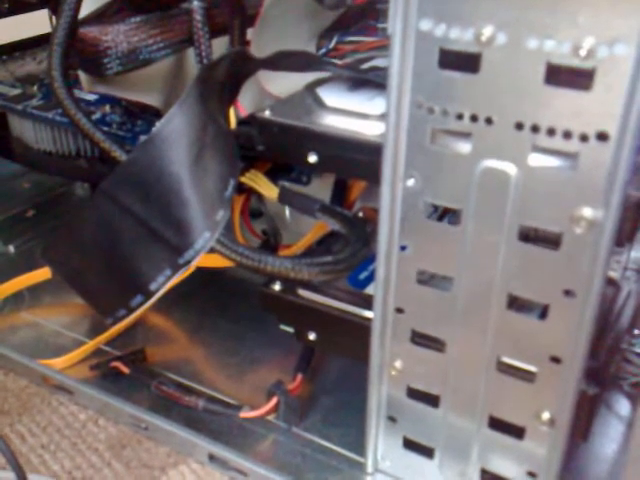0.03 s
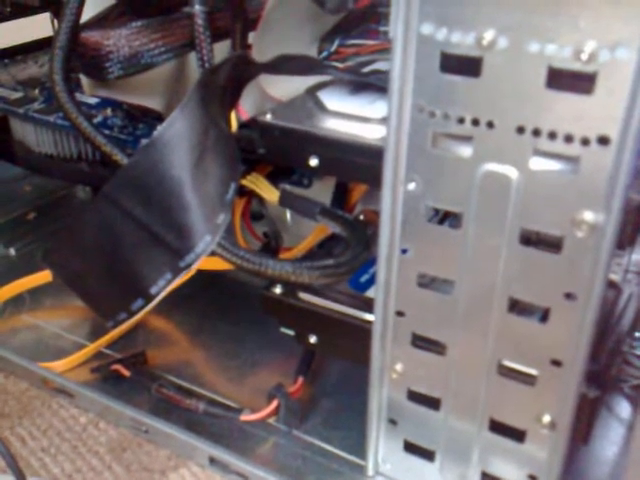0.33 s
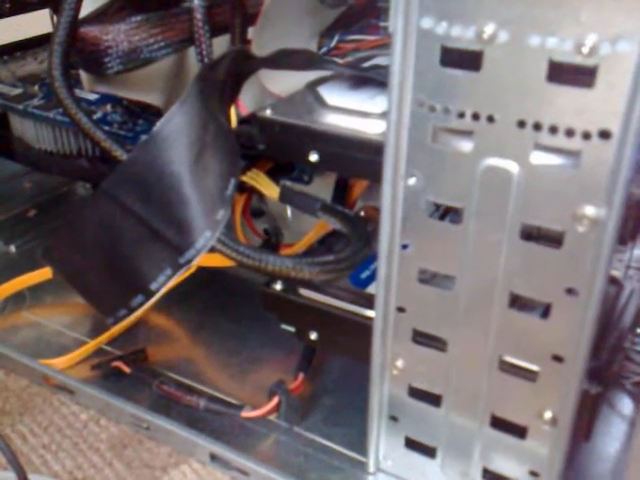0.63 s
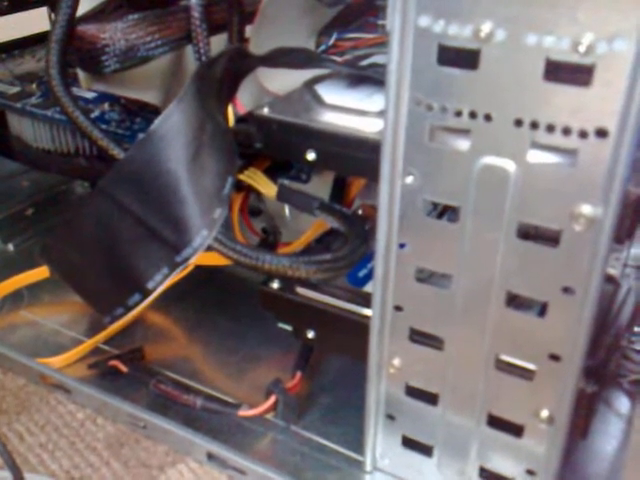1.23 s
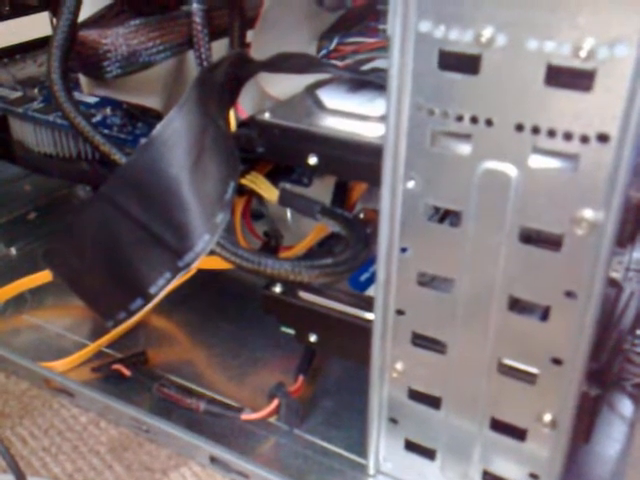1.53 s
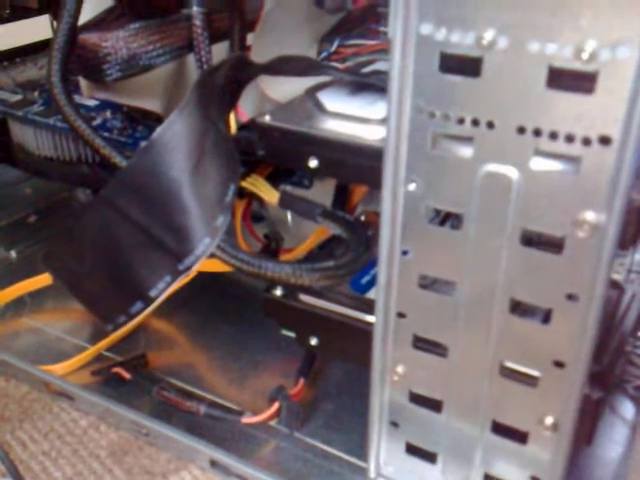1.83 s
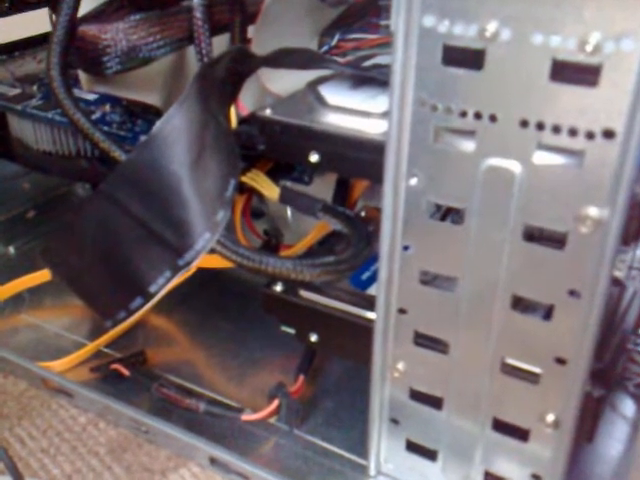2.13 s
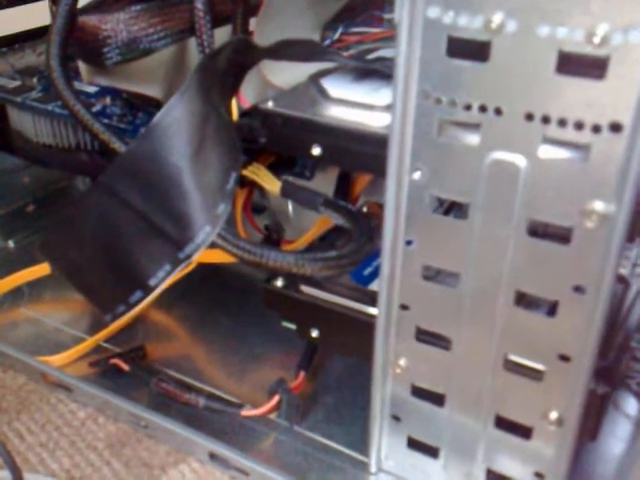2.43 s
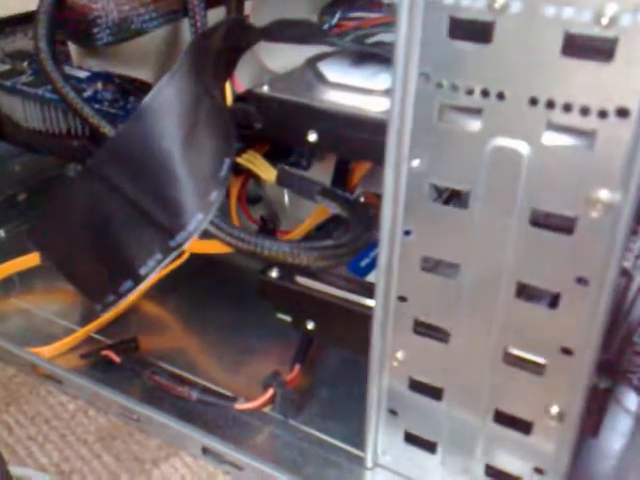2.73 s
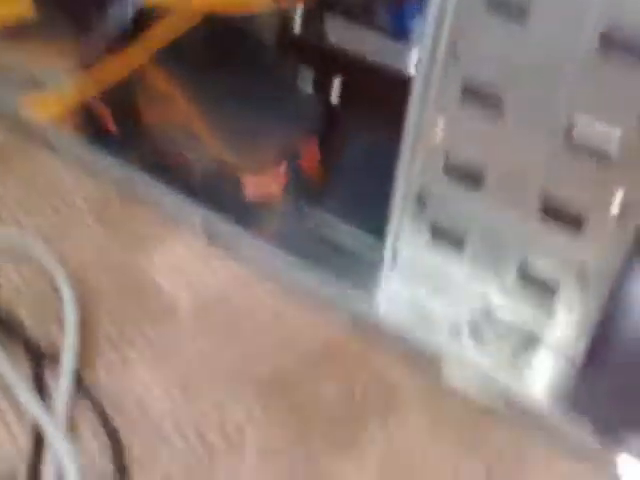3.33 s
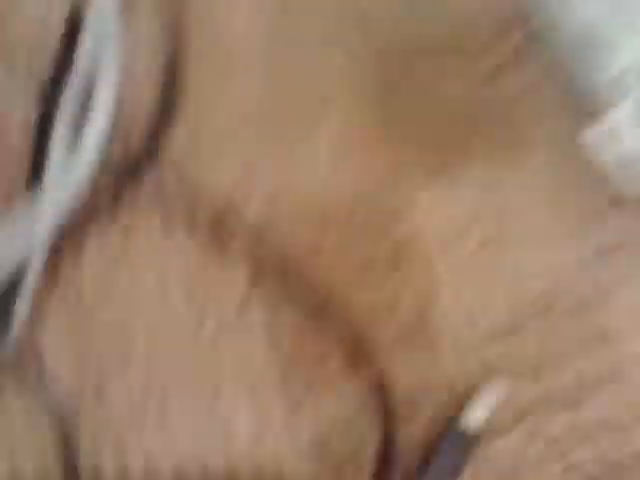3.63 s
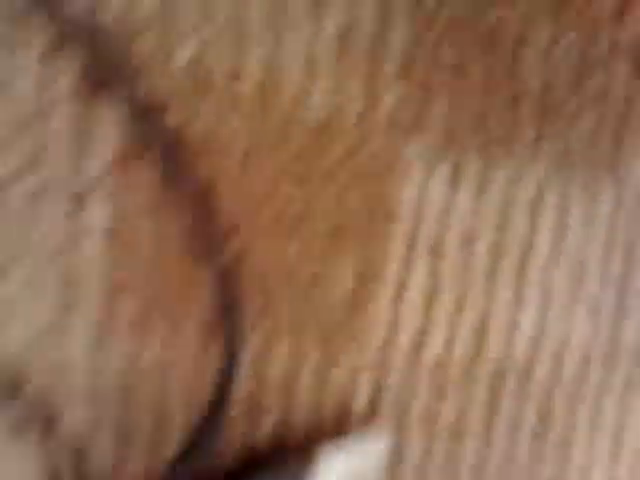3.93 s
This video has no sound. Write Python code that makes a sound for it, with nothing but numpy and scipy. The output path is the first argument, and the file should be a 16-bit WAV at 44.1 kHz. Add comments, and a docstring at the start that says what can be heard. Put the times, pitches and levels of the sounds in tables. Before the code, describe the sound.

A spinning hard drive makes an open metal computer case buzz, swelling and fading over a steady fan rush and low hum. Near the end, fingers click and knock lightly on the close hand-held microphone in the room.

```python
"""Fans rush steadily with a low hum and wavering tones, and a faint ring dies away at once.
Over them swells and fades a buzz: a spinning hard drive makes the sheet metal of an open computer
case slap once a turn, giving harmonics and a rasp. Near the end a hand-held camera swings down past
the case: fingers click and knock on its shell, the draught grows and a thin motor whine stands out."""
import sys
import numpy as np
from scipy import signal
from scipy.fft import rfft, irfft
from scipy.io import wavfile

SR = 44100
rng = np.random.default_rng(int(sys.argv[2]) if len(sys.argv) > 2 else 0)


def persist_wave(psi):
    """Save psi, clipped to +-1, as 16-bit WAV."""
    counts = np.round(np.clip(psi, -1, 1) * 32767).astype(np.int16)
    wavfile.write(sys.argv[1], SR, np.atleast_2d(counts).T)


N = 176400
TIME = np.arange(N) / SR


def amp(db):
    """Decibels to amplitude ratio."""
    return 10 ** (np.asarray(db) / 20)

def envelope(rows):
    """Gain interpolated in decibels between rows of (seconds, dB)."""
    return amp(np.interp(TIME, *np.array(rows).T))

def wander(rate_hz):
    """Slow random fluctuation with a standard deviation near 1."""
    steps = rng.standard_normal(1024)
    return 1.224 * np.interp(TIME * rate_hz, np.arange(len(steps)), steps)

def decay(t, t60):
    """Exponential damping: 60 dB in t60 seconds."""
    return np.exp(-np.log(1000) * t / t60)

def colour(x, points):
    """Zero-phase filtering by a curve of (Hz, dB)."""
    hz, db = np.array(points).T
    bins_hz = np.maximum(np.fft.rfftfreq(len(x), 1 / SR), 1)
    return irfft(rfft(x) * amp(np.interp(np.log(bins_hz), np.log(hz), db)), len(x))

def noise(density):
    """Gaussian noise with a spectral density of (Hz, dB per Hz)."""
    return colour(rng.standard_normal(N), density) * np.sqrt(SR / 2)


# The fans' rush. Each row: frequency in Hz, density in dB per Hz.
RUSH_SPECTRUM = [(20, -93), (55, -92), (90, -94), (120, -77), (150, -91), (250, -89), (290, -91.5),
                 (420, -93.5), (490, -85.5), (560, -96), (680, -98), (800, -98), (1020, -98), (1170, -89.5),
                 (1320, -99.5), (1550, -101), (1900, -100), (2600, -105), (3400, -107), (5500, -108.5),
                 (7000, -110), (9600, -110), (10100, -103), (10600, -110), (16000, -109)]
# The draught at a closeness of 0 dB. Each row: frequency in Hz, density in dB per Hz.
DRAUGHT_SPECTRUM = [(30, -102), (105, -83), (200, -82), (330, -87), (560, -94.5), (680, -90), (780, -87.5),
                    (1000, -99.5), (1160, -84), (1320, -96), (2700, -102), (3100, -99), (3400, -103),
                    (3800, -99), (4500, -105), (6000, -105), (8000, -114), (16000, -116)]
# Closeness to the fan as the camera swings. Each row: time in seconds, gain in dB.
CLOSENESS = [(0, -20), (2.6, -9), (3.1, -5), (3.5, -7), (3.75, -1.5), (3.87, 0.5), (4, 0.5)]
# Mains hum near 100 Hz, and fan and motor tones. Each row: frequency in Hz, distant level in dB, # change close
# by in dB, pitch wander in Hz.
TONES = [(99, -72.5, 13.5, 3.9), (119.8, -78, 20.5, 6.15), (249.5, -74.5, 6.5, 5.75),
         (361.7, -70, 5, 4.5), (970, -78.5, -6, 2.6), (975, -82, 3, 2.4), (1173, -80, 2, 19),
         (1442, -75, -4, 3.1), (3100, -100, 24, 20.3), (10110, -90, 3, 64)]

def fans():
    """Moving air gives broadband noise, rotation and the mains give tones; the draught grows with proximity."""
    close = envelope(CLOSENESS)
    tone_reach = close ** 2.3  # the tones carry less far than the draught
    out = noise(RUSH_SPECTRUM) * amp(0.5 * wander(22))
    out += close * noise(DRAUGHT_SPECTRUM) * amp(0.27 * wander(21.05))
    for hz, db, close_db, wander_hz in TONES:
        phase = 2 * np.pi * np.cumsum(hz + wander_hz * wander(50)) / SR
        level_db = db + close_db * tone_reach + 1.77 * wander(21.78)
        out += np.sqrt(2) * amp(level_db) * np.sin(phase)
    return out


# The motor's whine. Each row: time in seconds, level in dB.
WHINE_LEVEL = [(3.8, -84), (3.87, -80), (3.93, -71)]

def motor_whine(hz=12990):
    """Directivity: a high tone is beamed so narrowly that it stands out only after the swing."""
    level = envelope(WHINE_LEVEL) * amp(2 * wander(27))
    return np.sqrt(2) * level * np.sin(2 * np.pi * hz * TIME)


def faint_ring(hz=813, db=-55.5):
    """Free decay: one soft damped sinusoid at the very start."""
    return amp(db) * decay(TIME, t60=0.18) * np.sin(2 * np.pi * hz * TIME)


# The hand's rumble at a gain of 0 dB. Each row: frequency in Hz, density in dB per Hz.
RUMBLE_SPECTRUM = [(15, -100), (35, -85), (55, -69), (100, -79.5), (200, -86), (600, -112)]
# Strength of that rumble. Each row: time in seconds, gain in dB.
GRIP_GAIN = [(0, -7.5), (.3, -6.5), (.5, -6), (.66, -9.5), (1.05, -10.5), (1.6, -14.5), (2.4, -16),
             (2.9, -8.5), (3.4, -5), (3.66, 5), (3.74, -20), (4, -9)]

def grip_rumble():
    """Structure-borne noise: the hand sends a low rumble through the camera."""
    return envelope(GRIP_GAIN) * noise(RUMBLE_SPECTRUM)


def finger_scrape(at, width_s=0.0021, grain_db=8.5):
    """Friction: a burst of gritty noise that peaks at the moment of contact."""
    grit = rng.standard_normal(N) * amp(grain_db * rng.standard_normal(N))
    grit = signal.lfilter(*signal.butter(1, 495, "high", fs=SR), grit)
    grit = signal.lfilter(*signal.butter(2, 7000, fs=SR), grit)
    return grit * np.exp(-np.minimum(abs(TIME - at) / width_s, 20))

def finger_thump(age, hz=164, lag_s=0.0021, rise_s=0.00027):
    """A heavily damped oscillation: the whole camera recoils just after contact."""
    push = np.maximum(age - lag_s, 0)
    rise = 1 - np.exp(-push / rise_s)
    return -rise * decay(push, t60=0.0096) * np.sin(2 * np.pi * hz * push)

def shell_radiation(x, allpass_hz=(1900, 6200), low_cut_hz=330):
    """Dispersion: bending waves arrive smeared in time, treble first; the shell radiates little bass."""
    for hz in allpass_hz:
        poles = signal.butter(6, hz, fs=SR)[1]
        x = signal.lfilter(poles[::-1], poles, x)
    return signal.lfilter(*signal.butter(2, low_cut_hz, "high", fs=SR), x)

def room_reverb(x, db=-15.5):
    """Reverberation: diffuse reflections form a faint, short tail of noise."""
    tail = rng.standard_normal(SR // 2) * decay(TIME[:SR // 2], t60=0.079)
    return amp(db) * signal.fftconvolve(x, tail / np.linalg.norm(tail))[:N]

# Modes of the camera's plastic shell. Each row: frequency in Hz, relative level in dB,
# base 60 dB decay time in seconds.
SHELL_MODES = [(1250, -4.5, 0.0048), (1834, -2, 0.0079), (2190, -11.5, 0.0042), (2640, -6, 0.0075),
               (3485, -11, 0.0023), (4630, -10.5, 0.0026), (5670, -13, 0.0034), (6600, -15, 0.0038),
               (7460, -18.5, .005), (8120, -15.5, 0.01), (10600, -21, .0025)]
# The shell's registers in Hz: body, knock, clack, tick and edge.
SHELL_REGISTERS_HZ = (1000, 1900, 2700, 5700, 8200)
# Finger contacts. Each row: start in seconds, five register gains in dB, decay time factor,
# thump gain in dB, scrape gain in dB.
CONTACTS = [(2.9457, -54, -46, -36, -28, -48, 1.7, -59, -56),
            (3.1713, -35.5, -40, -33.5, -22, -26, 0.73, -27, -43),
            (3.5184, -21, -15.5, -19.5, -18.5, -28.5, 0.63, -35.5, -64),
            (3.559, -58, -37, -33, -36, -53, 1.5, -60, -51),
            (3.5717, -28, -43, -29, -41, -42, 0.52, -35.5, -46),
            (3.577, -36, -27.5, -22.5, -9, -21, 1.17, -22.5, -38.5),
            (3.6216, -17.5, -9, -17.5, -17, -44, 0.76, -51, -71),
            (3.6595, -32, -23, -20, -31, -51, 1, -18, -52)]

def finger_knocks():
    """Modal excitation: where a finger lands decides which of the shell's modes ring most."""
    clicks, thumps = np.zeros(N), np.zeros(N)
    for at, *register_db, decay_factor, thump_db, scrape_db in CONTACTS:
        live = (TIME > at) & (TIME < at + 0.1)
        age = TIME[live] - at
        ring = 1e-18 * rng.standard_normal(N)  # inaudible floor
        for hz, db, t60 in SHELL_MODES:
            ring[live] += amp(db) * decay(age, t60 * decay_factor) * np.sin(2 * np.pi * hz * age)
        clicks += colour(ring, list(zip(SHELL_REGISTERS_HZ, register_db)))
        clicks += amp(scrape_db) * finger_scrape(at)
        thumps[live] += amp(thump_db) * finger_thump(age)
    clicks = shell_radiation(clicks)
    return clicks + thumps + room_reverb(clicks)


# Strength of the buzz. Each row: time in seconds, gain in dB.
BUZZ_SWELL = [(0, -24), (.65, -14.5), (1.0, -7), (1.3, -2.5), (1.9, 0.5), (2.35, 0.5), (2.75, -1.2),
              (3.15, -4), (3.45, -8), (3.65, -10), (4, -22)]
# How the case radiates the spin's harmonics. Each row: harmonic number, relative level in dB.
CASE_HARMONICS = [(1, -7), (2, -13), (4, -24), (5, -17), (6, -6), (7, 0), (8, -5), (9, -4), (10, -9),
                  (11, -9), (12, -14), (13, -25), (14, -12), (16, -17), (17, -14), (18, -23), (19, -9),
                  (20, -15), (21, -23), (22, -28), (23, -32), (24, -31), (25, -27), (26, -30), (27, -28),
                  (29, -21), (31, -23), (32, -16), (33, -29), (34, -33), (35, -21), (36, -21), (38, -23),
                  (40, -28), (41, -22), (42, -17), (43, -29), (44, -14.5), (45, -27), (48, -28), (49, -31),
                  (50, -30)]
# Chattering metal at a swell of 0 dB. Each row: frequency in Hz, density in dB per Hz.
RASP_SPECTRUM = [(400, -108), (900, -91), (1500, -101), (2300, -100), (3000, -109), (4000, -106),
                 (5400, -105), (6600, -112), (9000, -109), (16000, -113)]

def hard_drive(spin_hz=120.1, hum_db=-64.5, buzz_db=-56, diffuse_hz=1400):
    """Forced vibration: the case slaps once a turn, so it rings at harmonics of the spin and rasps."""
    turns = np.cumsum(spin_hz * (1 + 0.00023 * wander(6.26))) / SR
    swell = envelope(BUZZ_SWELL)
    harmonics = np.zeros(N)
    for k, db in CASE_HARMONICS:
        hz = k * spin_hz
        # Above diffuse_hz the phases scatter, so the ringing fills the whole turn.
        scatter = min((hz / diffuse_hz) ** 2, np.pi) * rng.standard_normal()
        buzz = amp(buzz_db) * swell ** (1 + 0.21 * hz / 1000)  # a harder slap is brighter
        strength = buzz if k >= 5 else amp(hum_db)  # low harmonics hum on regardless
        level = strength * amp(db + 0.62 * wander(6.7))
        harmonics -= np.sqrt(2) * level * np.cos(2 * np.pi * k * turns + scatter)
    pulses = np.exp(-(turns % 1))
    pulses /= np.sqrt(np.mean(pulses ** 2))
    rasp = swell ** 0.73 * pulses * noise(RASP_SPECTRUM)
    return harmonics + rasp


def scene():
    """Superposition: all the sources add at one microphone."""
    return (hard_drive() + fans() + finger_knocks() + grip_rumble() + faint_ring() + motor_whine())[None]

def record(dry):
    """Band limiting: a steep low-pass filter cuts the top of the treble."""
    return signal.sosfilt(signal.ellip(10, 0.2, 70, 15850, fs=SR, output="sos"), dry)


dry = scene()
out = record(dry)
persist_wave(out)
```